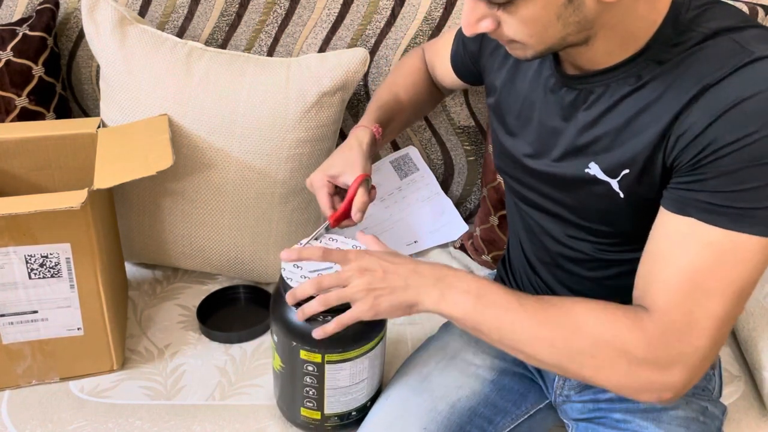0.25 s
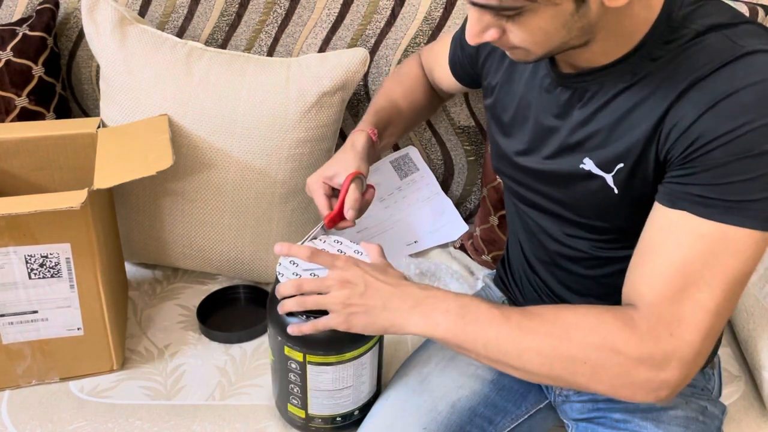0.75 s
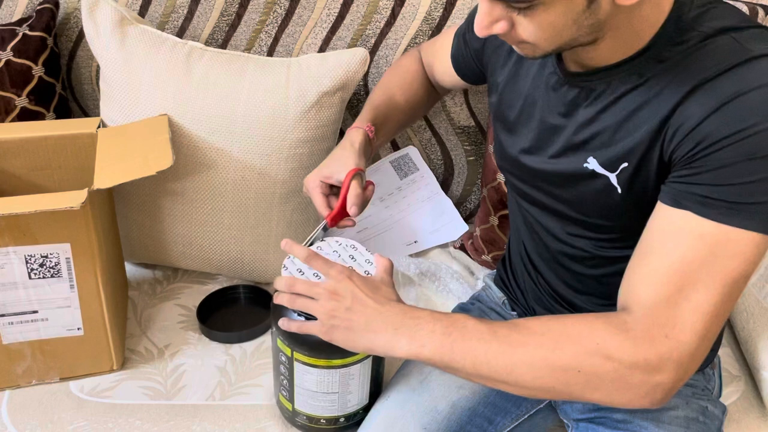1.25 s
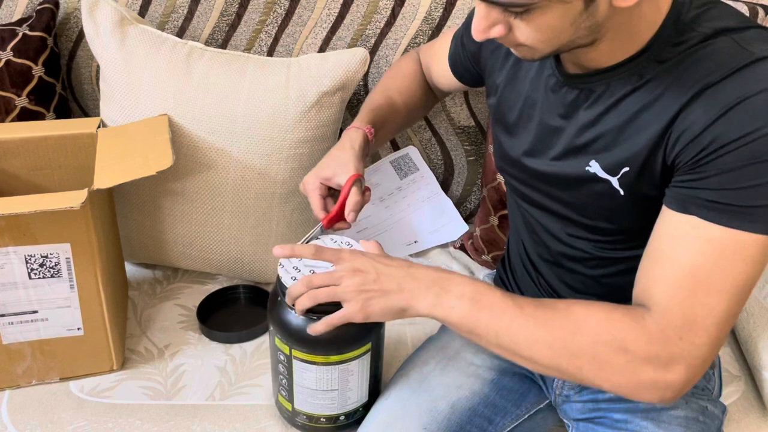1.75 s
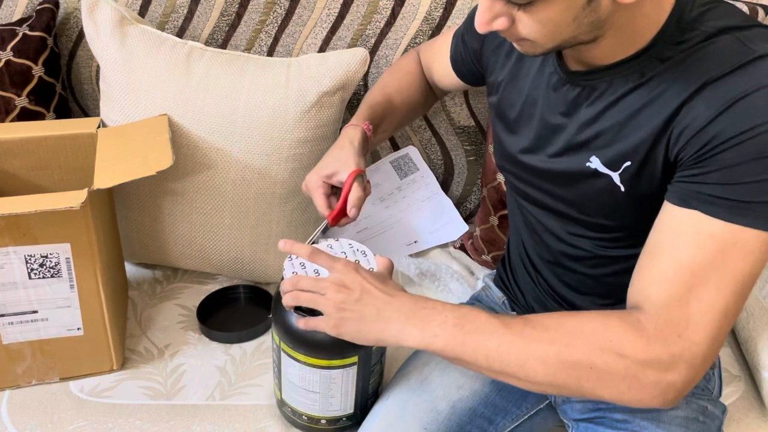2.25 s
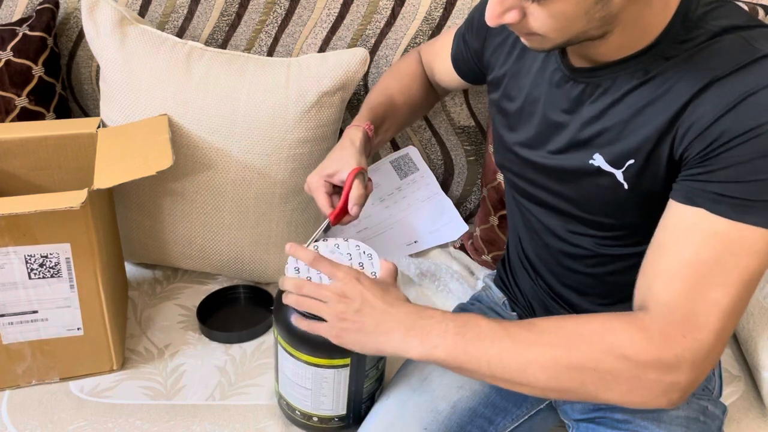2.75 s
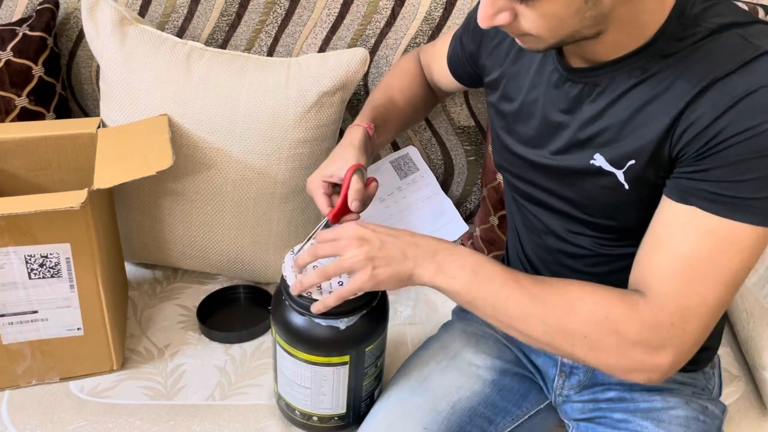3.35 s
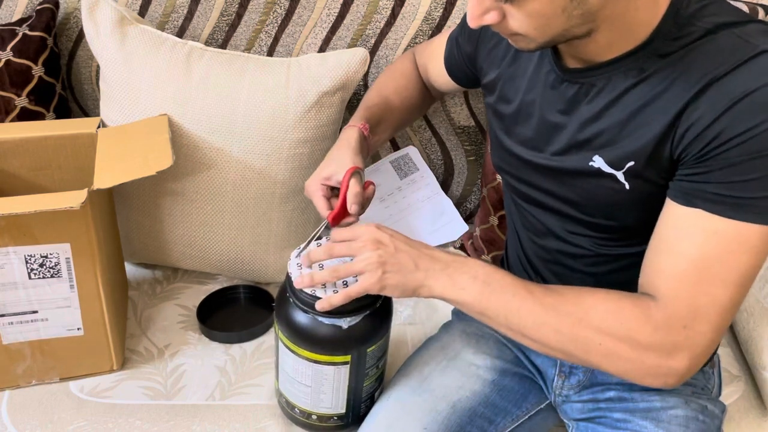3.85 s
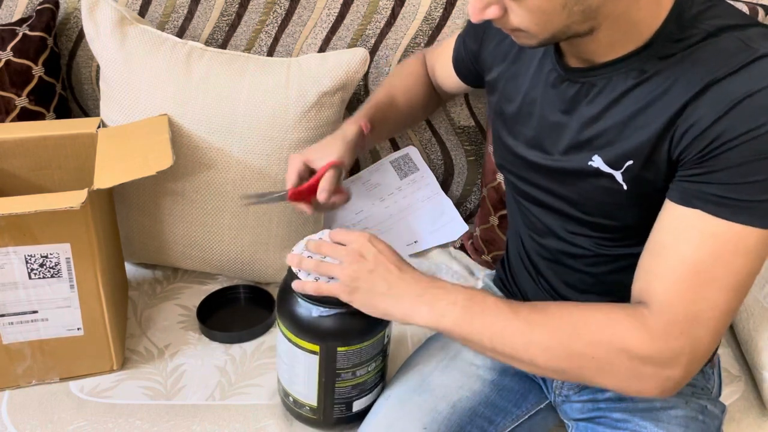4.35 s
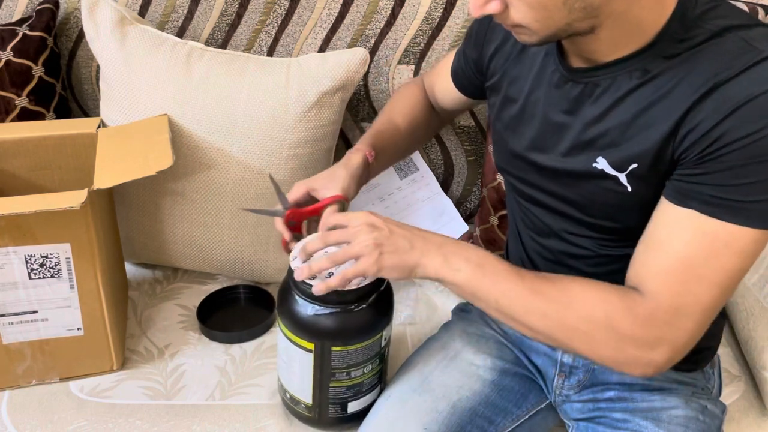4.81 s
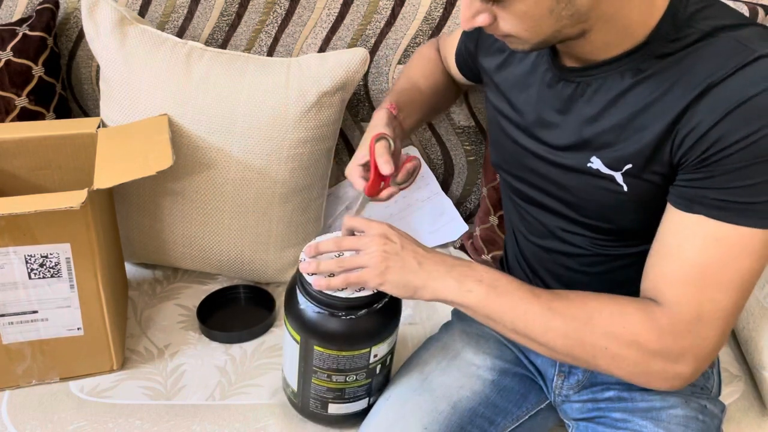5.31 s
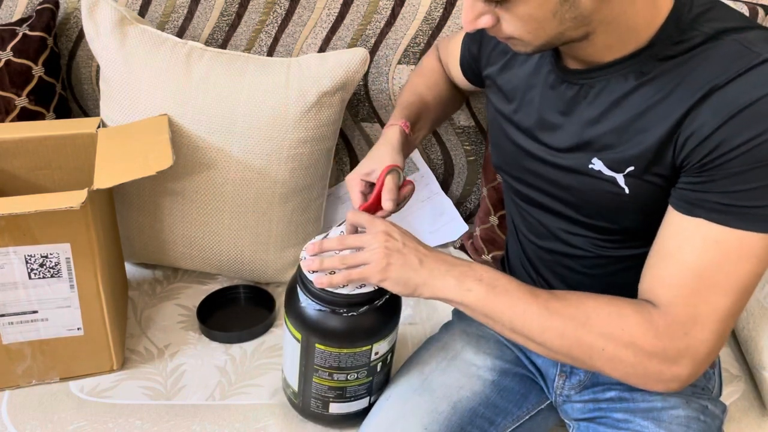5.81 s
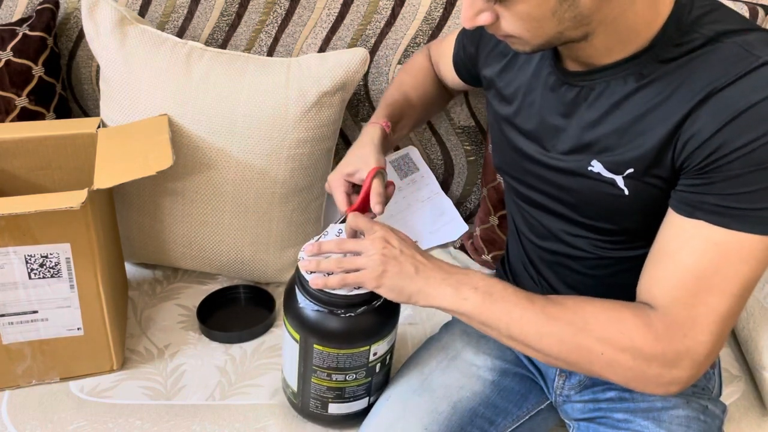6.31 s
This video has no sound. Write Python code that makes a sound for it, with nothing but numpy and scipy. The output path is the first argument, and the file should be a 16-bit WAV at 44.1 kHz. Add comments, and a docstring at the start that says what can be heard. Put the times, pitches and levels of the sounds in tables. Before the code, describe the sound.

Quiet room, close stereo pickup, short soft reverberation, low rumble and a very faint thin whine throughout. From 0 to 0.5 s, a soft rub, light foil crunches and small ticks. At 0.55 s a crisp cut brings a strong hollow pop, like a small drum around 300 Hz sinking in pitch. Irregular crunches follow at 0.84, 1.0 and 1.26 s with lighter pops and a dull tub judder, then gentler cuts and ticks until 2.9 s, including faint steel scrapes and bright clicks near 2.43 and 2.74 s. A hollow double-contact plastic knock comes at 3.15 s, a crunch at 3.59 s. At 3.9 s the loudest event: blades snap against the tub wall with a sharp crack and booming pop. Soft cloth rubs and slight creaks fill 4.2 to 5.7 s. A short, hard, crisp cut with a pop lands at 5.79 s, then crunches and a bright tick around 6.04 to 6.2 s, ending in a soft rub near 6.5 s.

```python
"""In a quiet living room, scissors work their way round the foil seal of a big plastic tub.
Each cut is a crunch of random fractures and shakes the tub; the taut foil pops like a small drum.
Blades and foil edges tick as short noise bursts; opening blades scrape; one hollow knock is a set of modes.
Once the blades snap shut against the tub's wall. In between, hand and tub slide over cloth as dense grains.
Filtered noise makes a low rumble, and a sine of wavering phase a faint whine."""
import sys
import numpy as np
from scipy import signal
from scipy.fft import rfft, irfft, next_fast_len
from scipy.io import wavfile
from scipy.ndimage import uniform_filter1d

SR = 44100
rng = np.random.default_rng(int(sys.argv[2]) if len(sys.argv) > 2 else 0)


def to_wav(s):
    """Save 16-bit WAV."""
    ch = np.atleast_2d(s).T  # columns
    pcm = np.round(np.clip(ch, -1, 1) * 32767)  # PCM
    wavfile.write(sys.argv[1], SR, pcm.astype(np.int16))


N = 289737
TIME = np.arange(N) / SR  # seconds

# Blades cut or crease the foil. Each row: time of the height in seconds, length in seconds,
# crunch drive in dB, judder drive of the tub relative to the crunch in dB.
CUTS = [(.088, 0.053, -56.5, -4), (0.126, 0.016, -56, 10), (.25, 0.063, -58.5, -15),
        (0.406, 0.085, -48, -4.5), (.542, 0.012, -42.5, -13), (0.597, .022, -44.5, -12),
        (.838, 0.038, -48, -1.5), (1.007, 0.0082, -38.5, -10), (1.025, .12, -55.5, -6),
        (1.261, 0.042, -47.5, -1), (1.537, 0.12, -59, -22), (1.869, 0.056, -57, 0.5),
        (2.095, 0.047, -49.5, 0.5), (2.262, 0.082, -59.5, -1.5), (2.484, 0.036, -48, 7.5),
        (2.679, 0.075, -60.5, -6), (2.782, 0.078, -60.5, -6), (2.822, 0.01, -46, -7),
        (2.871, .01, -46.5, -7.5), (3.587, 0.034, -44, 0.5), (3.898, 0.026, -44, 9), (4.469, 0.028, -54, 5),
        (4.662, 0.072, -64.5, 12), (5.419, 0.023, -51.5, 11), (5.79, 0.011, -30, -17),
        (6.037, 0.063, -52.5, 6.5), (6.154, 0.03, -48, -9), (6.201, 0.016, -41.5, -7)]
# Resonances of the foil. Each row: frequency in Hz, width in Hz, relative level in dB.
FOIL_MODES = [(1478, 96, -20), (2266, 240, -15.5), (2860, 197, -28), (3250, 280, -24)]
# Broad radiation of the foil. Each row: frequency in Hz, relative spectral level in dB.
FOIL_COLOUR = [(120, -22), (300, 5.5), (600, 0), (1000, -5.5), (1500, 1), (2400, -3), (3600, -7.5),
               (5000, -13), (8000, -24), (16000, -67)]
# Hiss of the sheared edge. Each row: frequency in Hz, relative spectral level in dB.
EDGE_COLOUR = [(500, -35), (2000, 6.5), (4000, 0), (6000, -0.5), (8500, 8.5), (11500, 6), (13000, 2.5),
               (16000, -49)]
# Judder of the tub. Each row: frequency in Hz, relative spectral level in dB.
JUDDER_COLOUR = [(100, -10), (200, 3.5), (340, 6), (480, -1), (650, -3.5), (850, -8), (1100, -12.5),
                 (1500, -11), (3000, -42)]
# The taut seal pops. Each row: time in seconds, peak of the drum sound in dB, nominal pitch in Hz.
POPS = [(.549, -16.5, 301), (.6, -39, 284), (.84, -35.5, 305), (1.009, -26, 257), (1.035, -40.5, 308),
        (1.262, -30, 284), (1.274, -26.5, 298), (1.852, -41.5, 276), (2.108, -34, 277), (2.241, -37, 314),
        (2.481, -27, 319), (2.509, -27.5, 286), (3.589, -39, 367), (3.8995, -10, 316), (4.466, -39.5, 345),
        (4.577, -42, 296), (4.7, -40, 338), (5.399, -36.5, 335), (5.419, -39, 292), (5.663, -39, 282),
        (5.793, -22, 291), (6.153, -32.5, 295)]
# Resonances of the tub's stiff wall. Each row: frequency in Hz, relative level in dB.
WALL_MODES = [(440, -7.5), (650, -4.5), (1090, -14.5)]
# Sharp ticks of blade and foil edge. Each row: start in seconds, drive in dB,
# extra drive of the foil body in dB.
TICKS = [(.084, -56.5, 9.5), (.357, -54.5, 0), (.364, -49, -5), (.399, -48, -5), (.6075, -48, 3.5),
         (0.9671, -52.5, 4), (1.256, -57.5, 15), (1.355, -56.5, 4), (1.5334, -48, -7), (1.8486, -47, -3.5),
         (2.0975, -55, 11), (2.23, -55.5, 2), (2.4303, -39.5, -38), (2.7386, -39.5, -10.5),
         (2.865, -49, -6), (2.999, -60.5, -4), (3.044, -73, 19.5), (3.53, -59.5, 5.5), (3.6178, -51, 4),
         (3.896, -32.5, 6.5), (4.7156, -60, 5), (4.8544, -50, -25), (5.3608, -65, 15), (5.637, -54.5, 7),
         (6.1445, -57, 9), (6.1511, -48.5, 11.5), (6.2042, -36, 2.5)]
# Rasp of the steel. Each row: frequency in Hz, relative spectral level in dB.
BLADE_COLOUR = [(1000, -46.5), (3000, -3.5), (4500, 5.5), (7000, 2.5), (9000, -4), (14000, -28.5)]
# Crisp edge of a tick. Each row: frequency in Hz, relative spectral level in dB.
CRISP_COLOUR = [(2000, -57.5), (6500, -13.5), (8500, 9.5), (10500, 5), (12300, -2.5), (14000, -13),
                (16000, -21)]
# The blades slide along each other as they open. Each row: time of the height in seconds,
# length in seconds, level in dB.
SCRAPES = [(1.545, 0.037, -65.5), (2.454, 0.036, -65), (2.76, 0.042, -56.5)]
# Resonances of the knock, probably the scissors' handle. Each row: frequency in Hz, width in Hz,
# relative level in dB.
HANDLE_MODES = [(544, 114, 9.3), (1170, 380, 1.8), (1554, 67, 13.7), (2370, 290, 7.1), (3480, 140, 0.5)]
# Hand and tub slide over cloth. Each row: time of the height in seconds, length in seconds, level in dB.
RUBS = [(0, 0.051, -57), (1.945, 0.12, -64), (3.228, 0.039, -63), (4.271, .157, -60.5), (4.616, 0.17, -64),
        (4.888, 0.1, -57), (5.223, 0.025, -65), (5.621, 0.085, -59), (6.479, 0.11, -56.5)]
# Friction on the cloth. Each row: frequency in Hz, relative spectral level in dB.
CLOTH_COLOUR = [(100, -13), (350, 13.5), (900, 4.5), (2500, 7), (4000, 2), (6000, -6), (9000, 3),
                (12000, 3), (13200, -2.5), (15000, -40)]
# Decay of the room. Each row: frequency in Hz, time to fall by 60 dB in seconds.
ROOM_T60 = [(150, 0.29), (500, 0.39), (2000, 0.34), (6000, 0.37), (13000, 0.28)]
# Strength of the reverberation. Each row: frequency in Hz, echo energy over direct energy in dB.
ROOM_DB = [(150, 0), (300, -15.5), (550, -3), (2000, -2.5), (5000, -2.5), (12000, -8.5)]
# Coherence of diffuse sound. Each row: frequency in Hz, left-right likeness from 0 to 1.
LIKENESS = [(100, 0.98), (350, 0.63), (900, 0.052), (2500, 0.75), (6000, 0.09), (8000, 1), (11000, 1),
            (14000, 1)]
# Low rumble of the room. Each row: frequency in Hz, relative spectral level in dB.
RUMBLE_COLOUR = [(20, -49.5), (30, -14), (48, 1.5), (90, 2), (140, -5), (220, -3.5), (340, -18.5),
                 (900, -32.5), (1700, -35.5), (2300, -37), (4500, -45), (7000, -47), (8500, -40.5),
                 (12000, -39), (14500, -87)]
# Phase of the microphone pair. Each row: frequency in Hz, lead of the left in radians.
PORT_PHASE = [(30, -0.1), (120, -0.42), (1400, 1.29), (2200, 0.66), (3200, 1.47), (5200, 1), (5800, -2),
              (7000, -1.43), (7900, -3), (9300, -2.5), (11000, -5), (12600, -6)]
# Balance of the microphone pair. Each row: frequency in Hz, left minus right in dB.
PORT_BALANCE = [(60, 1.6), (300, 2), (600, 3), (1100, 3.5), (1600, 3), (3000, 3.5), (5300, 6.5), (7000, 2),
                (8000, 1)]

RISE_SHARE = 0.42  # share of a hand stroke's length in which it swells
# Sheared edge: drive in a usual cut, dB per dB of crunch, and the crunch of a usual cut.
EDGE_DB, EDGE_FOLLOWS, USUAL_CUT_DB = -55, 0.92, -49
JUDDER_LAG_S = 0.0074  # the tub answers a moment after the blades
# Time for a vanishingly light pop to reach its height, and the share added for a full-scale one.
POP_SWELL_S, SWELL_GROWS = 0.005, 0.3
# Wall ringing along: drive for a full-scale pop, and dB per dB of pop.
WALL_DB, WALL_FOLLOWS = -22.5, 0.66
SNAP_S, SNAP_DB = 3.895, -8.5  # the blades strike the wall: start, drive of its modes
RASP_FOLLOWS = 0.33  # growth of a tick's rasp with its foil share, dB per dB
KNOCK_S, KNOCK_DB = 3.154, -12  # first contact, drive of each contact
RUMBLE_DB = -53  # rms level
WHINE_HZ, WHINE_LEFT_DB, WHINE_RIGHT_DB = 1693, -67.5, -63.5
CUTOFF_HZ = 16300  # from here up the microphone pair loses at least 60 dB


def cuts():
    """Fracture: shearing frees energy in spurts of tiny breaks; a harder cut has more body."""
    peak_s, length_s, body_db, _ = np.transpose(CUTS)
    edge_db = EDGE_DB + EDGE_FOLLOWS * (body_db - USUAL_CUT_DB)
    spurts = clumps(depth_db=4, per_s=260)
    body_fractures = evened(spurts * grains(per_s=1800, spread_db=2.0))
    edge_fractures = evened(spurts * grains(per_s=3900, spread_db=3.0))
    body = foil_body(strokes(peak_s, length_s, body_db) * body_fractures)
    edge = colour(strokes(peak_s, length_s, edge_db) * edge_fractures, EDGE_COLOUR)
    return body + edge


def clumps(depth_db, per_s):
    """Intermittency: the foil catches and gives way in spurts, an uneven gain of rms one."""
    draws = rng.standard_normal(int(per_s * N / SR) + 2)
    levels_db = depth_db * np.clip(draws, -2, 2)
    gain_db = np.interp(TIME * per_s, np.arange(len(levels_db)), levels_db)
    return rms_one(from_db(gain_db))


def foil_body(force, ring_db=14):
    """Forced plate vibration: the foil radiates a force broadly and rings briefly at its own modes."""
    ringing = sum(from_db(db) * resonate(force, hz, width) for hz, width, db in FOIL_MODES)
    return 0.54 * colour(force, FOIL_COLOUR) + from_db(ring_db) * ringing


def drags():
    """Stick-slip: as a cut drags on the rim, uneven catching and slipping shakes the tub's wall."""
    peak_s, length_s, cut_db, judder_db = np.transpose(CUTS)
    slips = evened(grains(per_s=980, spread_db=1))
    return colour(strokes(peak_s + JUDDER_LAG_S, length_s, cut_db + judder_db) * slips, JUDDER_COLOUR)


def pops(wall_swell_s=0.0031, thud_hz=130, thud_db=-30, thud_s=0.016, size=5000):
    """Membrane tension: the seal gives way, swells for a cycle or two and sinks in pitch as it slackens."""
    out, t = np.zeros(N + size), np.arange(size) / SR
    stretch, slacken_s, rest = 2.4, 0.005, 0.33
    tension = np.exp(-t / slacken_s) - rest
    wall_tones = sum(from_db(db) * np.sin(2 * np.pi * hz * t) for hz, db in WALL_MODES)
    wall = swell(t, wall_swell_s) * wall_tones
    thud = from_db(thud_db) * swell(t, thud_s) * np.sin(2 * np.pi * thud_hz * t)
    for s, db, pitch_hz in POPS:
        force = from_db(db)
        # a harder pop stretches the foil more, so its pitch falls further
        cycles = np.cumsum(pitch_hz * (1 + stretch * force * tension)) / SR
        drum = swell(t, POP_SWELL_S * (1 + SWELL_GROWS * force)) * np.sin(2 * np.pi * cycles)
        at = int((s - POP_SWELL_S / 4) * SR)  # the swell begins just ahead of the listed time
        out[at:at + size] += force * drum
        out[at:at + size] += from_db(WALL_DB + WALL_FOLLOWS * db) * wall
        # the whole tub answers with a low thud, which the cushion under it restrains
        out[at:at + size] += np.sqrt(force) * thud
    at = int(SNAP_S * SR)
    out[at:at + size] += from_db(SNAP_DB) * wall
    return out[:N]


def swell(t, peak_s):
    """Damped response: rise to one at peak_s, then die away."""
    age = t / peak_s
    return (age * np.exp(1 - age)) ** 2


def ticks(body_db=27, rasp_db=21.5, edge_db=28, size=1100):
    """Sudden slip: a crack with weaker, longer chatter; floppy foil takes longer over it than steel."""
    forces, t = np.zeros((3, N + size)), np.arange(size) / SR
    crack_s = np.array([[0.0028], [0.002], [0.001]])  # decay of foil body, steel and crisp edge
    chatter_s, chatter_db = 0.005, -11
    envelopes = np.exp(-t / crack_s) + from_db(chatter_db) * np.exp(-t / chatter_s)
    noises = rng.standard_normal((len(TICKS), size))
    for (s, db, foil_db), noise in zip(TICKS, noises):
        at = int(s * SR)
        bursts = pitchless(noise * envelopes)
        drives_db = [body_db + foil_db, rasp_db + RASP_FOLLOWS * foil_db, edge_db]
        gains = from_db(db) * from_db(drives_db) / np.linalg.norm(bursts, axis=1)
        forces[:, at:at + size] += gains[:, None] * bursts
    body, blade, edge = forces[:, :N]
    return foil_body(body) + colour(blade, BLADE_COLOUR) + colour(edge, CRISP_COLOUR)


def pitchless(bursts, count=2):
    """Flat spectrum: a crack with its energy spread almost evenly over frequency has no pitch."""
    fade = np.cos(np.linspace(0, np.pi / 2, bursts.shape[-1])) ** 2
    for _ in range(count):
        phase = np.angle(rfft(bursts))
        bursts = irfft(np.exp(1j * phase), len(fade)) * fade
    return bursts


def scrapes():
    """Dry friction: steel rasps on steel in fine, dense slips."""
    slips = evened(grains(per_s=2600, spread_db=5.0))
    return colour(strokes(*np.transpose(SCRAPES)) * slips, BLADE_COLOUR)


def knock(bounce_s=0.00302):
    """Impact: plastic meets plastic and bounces once, each contact exciting the same modes."""
    force = np.zeros(N)
    force[[int(KNOCK_S * SR), int((KNOCK_S + bounce_s) * SR)]] = from_db(KNOCK_DB)
    # neighbouring modes alternate in sign
    return sum((-1) ** k * from_db(db) * resonate(force, hz, width)
               for k, (hz, width, db) in enumerate(HANDLE_MODES))


def rubs():
    """Fibre friction: fibres catch and let go so densely that they merge into a soft hiss."""
    return colour(strokes(*np.transpose(RUBS)) * grains(per_s=9700, spread_db=5.0), CLOTH_COLOUR)


def strokes(times, lengths, levels_db):
    """Addition of power: hand strokes, each swelling to its height and easing off, as an envelope."""
    power = np.zeros(N)
    for s, length, db in zip(times, lengths, levels_db):
        rise, fall = RISE_SHARE * length, (1 - RISE_SHARE) * length
        near = slice(*np.searchsorted(TIME, [s - 3 * rise, s + 3 * fall]))
        t = TIME[near] - s
        power[near] += from_db(db) ** 2 * np.exp(-(t / np.where(t < 0, rise, fall)) ** 2)
    return np.sqrt(power)


def grains(per_s, spread_db):
    """Shot noise: tiny events at random moments, of uneven size; rms one."""
    sizes = from_db(spread_db * np.minimum(rng.exponential(1, N), 4))
    signs = rng.choice([-1, 1], N)
    happens = rng.random(N) < per_s / SR
    return rms_one(sizes * signs * happens)


def evened(x, size=600):
    """Energy budget: mean power over about 14 ms is held near one, however it splits into fractures."""
    power = np.maximum(uniform_filter1d(x ** 2, size), 0)
    return x / np.sqrt(power + 1e-4)


def room(x, build_s=0.006, size=26000):
    """Reverberation: direct sound plus a diffuse tail that builds up and dies octave by octave."""
    t, noise = np.arange(size) / SR, rfft(diffuse(size))
    centres, tail = np.geomspace(125, 16000, 8), 0
    for hz, share in zip(centres, np.eye(len(centres))):
        weights = at_hz(np.column_stack([centres, share]), bins(t))
        band = irfft(noise * weights, size)
        decay = from_db(-60 * t / at_hz(ROOM_T60, hz)) * (1 - np.exp(-(t / build_s) ** 2))
        tail = tail + from_db(at_hz(ROOM_DB, hz)) * band * decay / np.linalg.norm(decay)
    return x + signal.fftconvolve(x[None], tail, axes=1)[:, :N]


def diffuse(size):
    """Diffuse field: white noise from all sides, partly alike at the two microphones."""
    padded = next_fast_len(size)
    mid, side = rfft(rng.standard_normal((2, padded)))
    alike = np.clip(at_hz(LIKENESS, np.linspace(0, SR / 2, len(mid))), 0, 1)
    pair = np.sqrt((1 + alike) / 2) * mid + np.sqrt((1 - alike) / 2) * side * [[1], [-1]]
    return irfft(pair, padded)[:, :size]


def background():
    """Ambient noise: a low room rumble and the thin whine of some appliance."""
    return rumble() + whine()


def rumble(lead_in=8192):
    """Filtered noise: a diffuse field shaped towards the lows, past the filter's onset."""
    sides = [colour(side, RUMBLE_COLOUR, size=8192)[-N:] for side in diffuse(N + lead_in)]
    return from_db(RUMBLE_DB) * rms_one(np.array(sides))


def whine(width_hz=5, lag=3.12):
    """Phase diffusion: a wandering phase widens a sine; the left lags by the given radians."""
    waver = np.cumsum(rng.standard_normal(N)) * np.sqrt(2 * np.pi * width_hz / SR)
    tone = np.sin(2 * np.pi * WHINE_HZ * TIME + waver - np.array([[lag], [0]]))
    return from_db([[WHINE_LEFT_DB], [WHINE_RIGHT_DB]]) * rms_one(tone)


def colour(x, spectrum, size=2048):
    """Minimum phase: a causal filter of unit energy follows from the log spectrum alone."""
    cepstrum = irfft(np.log(from_db(at_hz(spectrum, bins(np.zeros(size))))))
    # fold the cepstrum onto positive times
    cepstrum[1:size // 2] *= 2
    cepstrum[size // 2 + 1:] = 0
    response = irfft(np.exp(rfft(cepstrum)))
    return signal.oaconvolve(x, response / np.linalg.norm(response))[:len(x)]


def resonate(x, hz, width):
    """Damped oscillator: a two-pole resonance with a gain of about one at its top."""
    r = np.exp(-np.pi * width / SR)
    zeros = np.array([1, 0, -1]) * (1 - r * r) / 2
    poles = [1, -2 * r * np.cos(2 * np.pi * hz / SR), r * r]
    return signal.lfilter(zeros, poles, x + 1e-18)  # the offset avoids denormal numbers


def from_db(db):
    """Logarithmic level: decibels to amplitude gain."""
    return 10 ** (np.asarray(db) / 20)


def rms_one(x):
    """Normalised power: scale to an rms of one."""
    return x / np.sqrt(np.mean(x ** 2) + 1e-20)


def at_hz(points, hz):
    """Logarithmic frequency: read a table by interpolation on a log-frequency axis."""
    f, value = np.transpose(points)
    return np.interp(np.log(np.maximum(hz, 1)), np.log(f), value)


def bins(x):
    """Discrete spectrum: the frequencies in Hz of the spectrum of x."""
    return np.fft.rfftfreq(x.shape[-1], 1 / SR)


def scene():
    """Superposition: all the handiwork sounds from one spot in the room, over the background."""
    handiwork = cuts() + drags() + pops() + ticks() + scrapes() + knock() + rubs()
    return room(handiwork) + background()


def record(dry):
    """Linear reception: the two ports differ in phase and level by frequency; the top is cut."""
    size = next_fast_len(N + 2000)
    hz, sides = bins(np.zeros(size)), np.array([[0.5], [-0.5]])
    balance = from_db(sides * at_hz(PORT_BALANCE, hz))
    ports = balance * np.exp(1j * sides * at_hz(PORT_PHASE, hz))
    heard = irfft(rfft(dry, size) * ports, size)[:, :N]
    return signal.sosfilt(signal.cheby2(14, 60, CUTOFF_HZ, fs=SR, output="sos"), heard)


dry = scene()
out = record(dry)
to_wav(out)
```